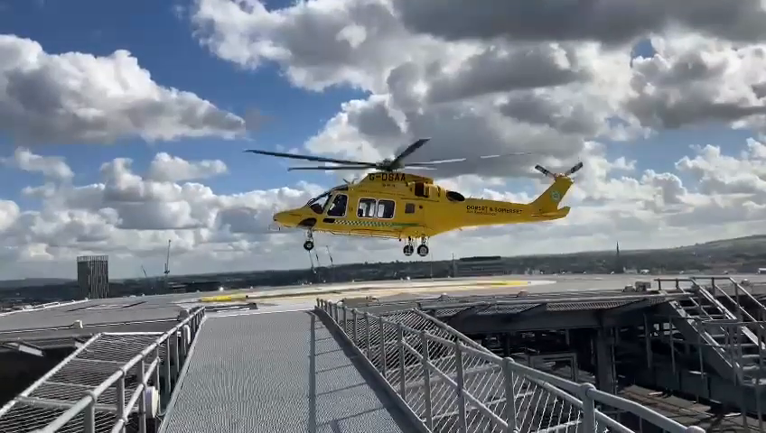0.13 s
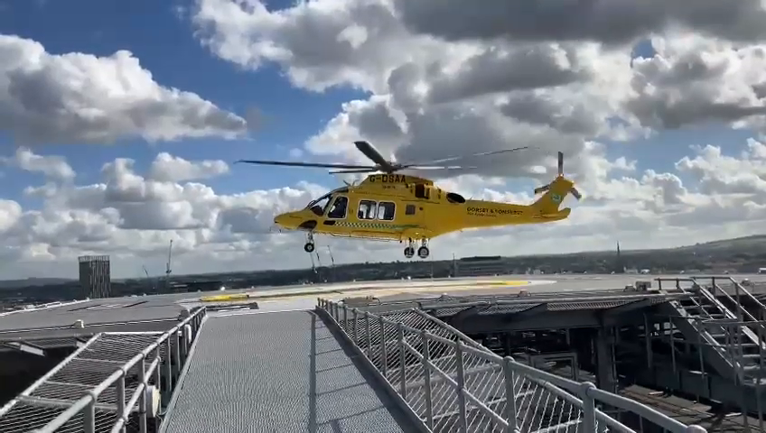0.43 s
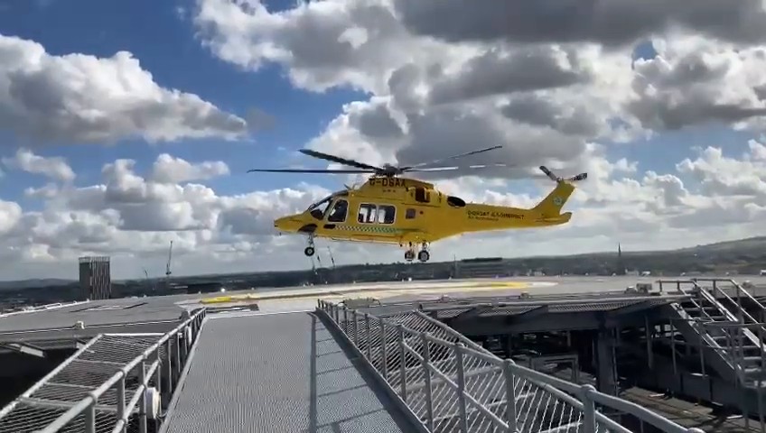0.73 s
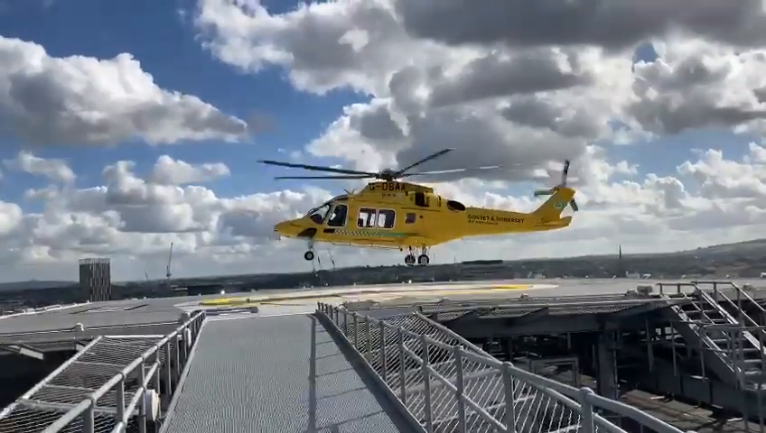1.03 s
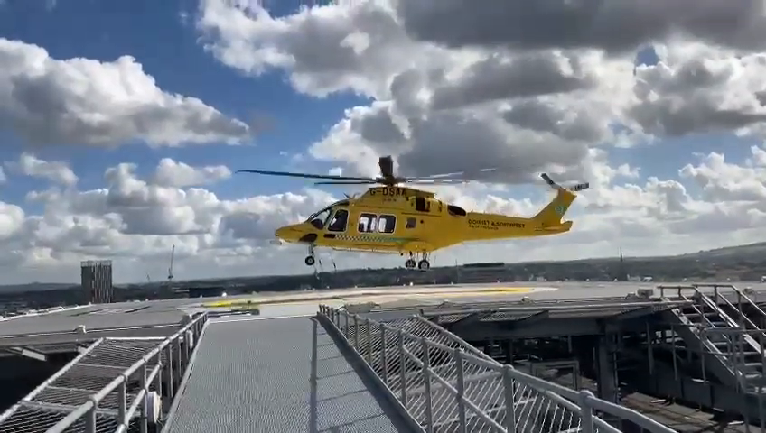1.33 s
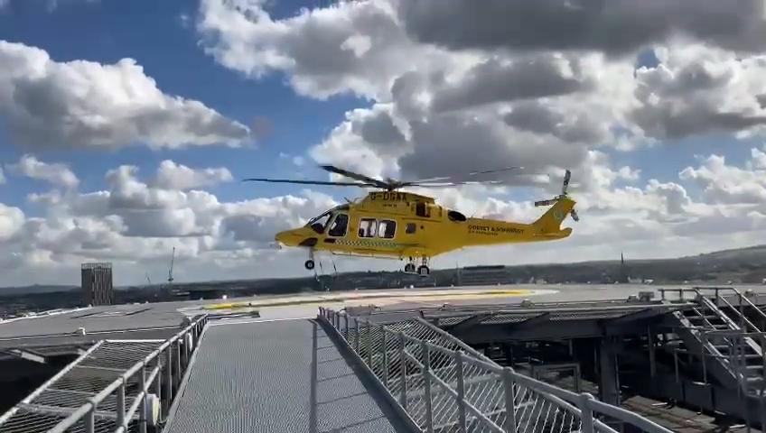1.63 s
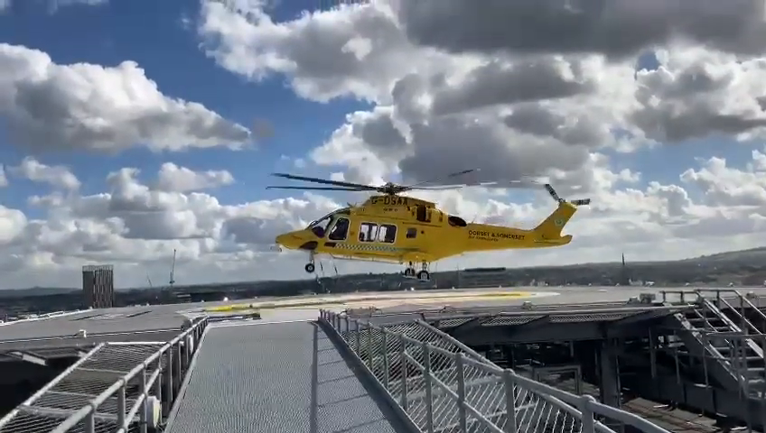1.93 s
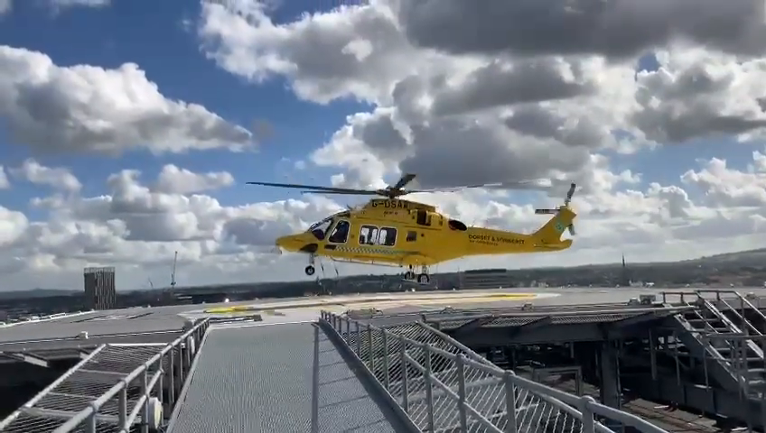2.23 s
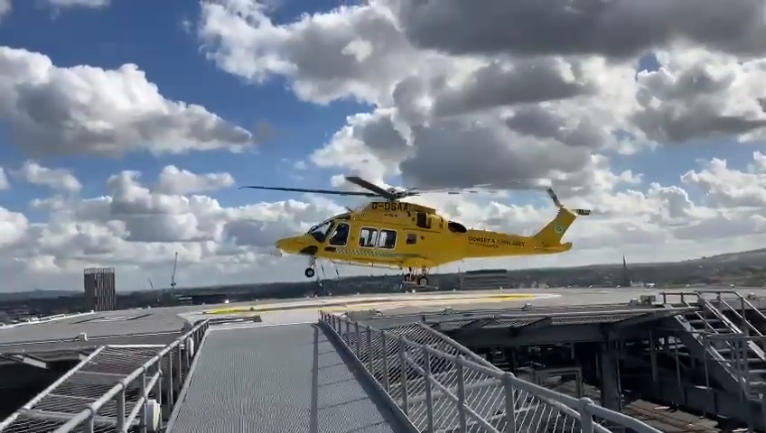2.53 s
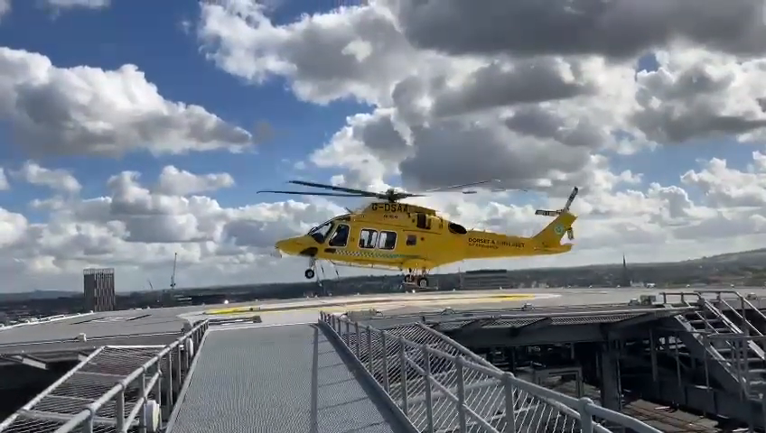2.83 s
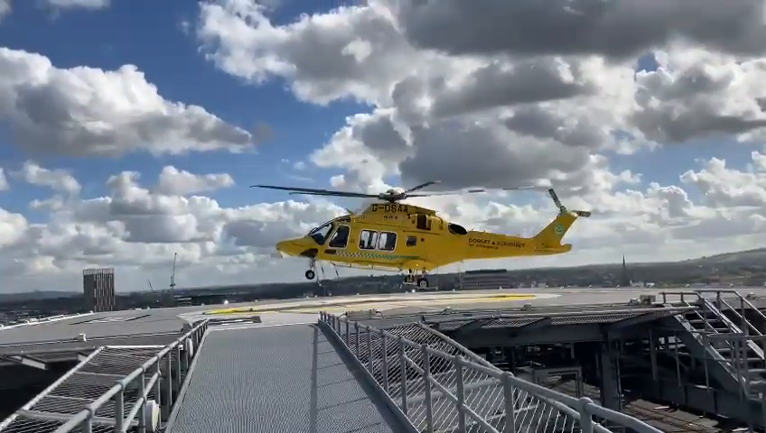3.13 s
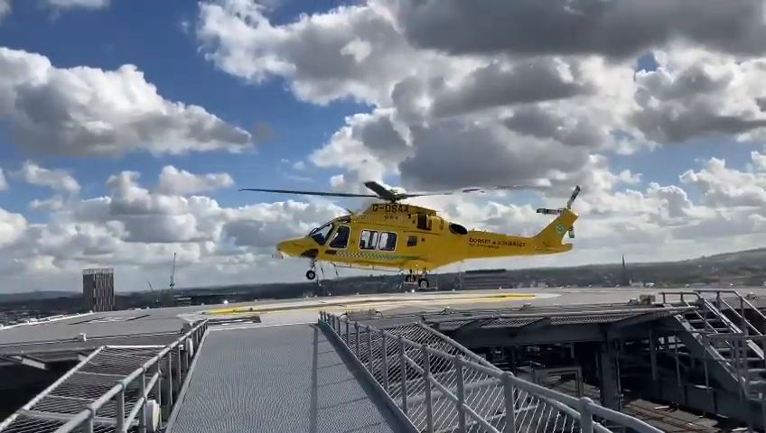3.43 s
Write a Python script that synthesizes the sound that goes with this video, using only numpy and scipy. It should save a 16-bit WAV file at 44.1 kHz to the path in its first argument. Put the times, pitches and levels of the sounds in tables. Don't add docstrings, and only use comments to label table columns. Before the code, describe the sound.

A helicopter hovers nearby over an open rooftop for 3.6 seconds. Blades slap about 29 times a second, loudest until 0.4, then softer and duller near the end, with short deck echoes. A very high whine flutters over rumble and hissing roar, strongest around 1.5. Wind thumps the microphone strongly near 0.6 and from 2.2 to 2.8, with crackles and sharp pops, then again around 3.3.

```python
import sys
import numpy as np
from scipy import signal
from scipy.fft import rfft, irfft, next_fast_len
from scipy.io import wavfile
from scipy.ndimage import uniform_filter1d

SR = 44100
rng = np.random.default_rng(int(sys.argv[2]) if len(sys.argv) > 2 else 0)


def store_pcm(level_fs):
    pcm = np.round(np.clip(level_fs, -1, 1) * 32767).astype(np.int16)
    wavfile.write(sys.argv[1], SR, np.atleast_2d(pcm).T)


def nominal_scale(level):
    x = np.asarray(level, float) / 20
    return 10 ** x


N = 158319


def in_time(rows):
    seconds, *columns = np.transpose(rows)
    return [np.interp(np.arange(N) / SR, seconds, column) for column in columns]


def rms_one(x):
    return x / np.sqrt(np.mean(x ** 2) + 1e-20)


def at_hz(points, hz, column=1):
    points = np.array(points)
    return np.interp(np.log(hz), np.log(points[:, 0]), points[:, column])


def drift(rate):
    r = np.exp(-40 * np.pi * rate / SR)
    noise = rng.standard_normal(N // 20 + 4002)
    slow = signal.lfilter([1], [1, -2 * r, r * r], noise)[4000:]
    return np.interp(np.arange(N) / 20, np.arange(len(slow)), rms_one(slow))


def ring(clicks, hz, t60):
    r, w = nominal_scale(-60 / (t60 * SR)), 2 * np.pi * hz / SR
    for _ in range(2):
        clicks = signal.lfilter([0, np.sin(w)], [1, -2 * r * np.cos(w), r * r], clicks + 1e-18)
    return clicks * 2 * np.e * (1 - r)


def narrow(hz, width_hz):
    smear = drift(width_hz) + 1j * drift(width_hz)
    carrier = np.exp(2j * np.pi * np.cumsum(hz + np.zeros(N)) / SR)
    return rms_one(np.real(smear * carrier))


# frequency in Hz, likeness from 0 to 1, lead of the left port in radians.
PORT_LIKENESS = [(60, 0.28, 0.58), (280, 0.16, -1.08), (640, 0.91, 1.72), (1500, 0.98, 0.79),
                 (2660, 0.43, 2.5), (5300, 0.035, 1.6), (7900, 0.24, -2.5), (11200, 0.77, -2)]


def banded_noise(spectrum, patchy_db, rate):
    size = next_fast_len(N)
    hz = np.arange(1, size // 2 + 2) * SR / size
    low, high = spectrum[0][0], spectrum[-1][0]
    shape = nominal_scale(at_hz(spectrum, hz)) * ((hz > low) & (hz < high))
    mid, side = rfft(rng.standard_normal((2, size))) * shape
    alike = np.clip(at_hz(PORT_LIKENESS, hz), 0, 1)
    left_right = np.array([[1], [-1]])
    pair = np.sqrt(1 + alike) * mid + np.sqrt(1 - alike) * side * left_right
    pair = pair * np.exp(.5j * at_hz(PORT_LIKENESS, hz, column=2) * left_right)
    out, together = 0, drift(rate / 2)
    for step in np.arange(np.floor(2 * np.log2(low)), 2 * np.log2(high) + 1):
        band = np.clip(1 - abs(2 * np.log2(hz) - step), 0, 1)
        flicker = nominal_scale(patchy_db * (0.33 * together + drift(rate)))
        out = out + flicker * irfft(pair * band, size)[:, :N]
    return rms_one(out)


# time in seconds, level in dB.
STEADY_WASH = [(0, -45), (.5, -53), (1.0, -43), (1.3, -36), (1.5, -31), (1.8, -46.5), (2.2, -36.5),
               (2.9, -33), (3.2, -31), (3.59, -34)]
# middle in seconds, length in seconds, level in dB,
# crackle in dB relative to the gust.
PORT_GUSTS = [(0.405, 0.14, -30.5, -5.5), (0.574, 0.028, -21, -31), (0.64, 0.052, -14.5, -17),
              (0.696, 0.071, -19.5, -10), (0.799, 0.079, -24, -26), (0.872, 0.045, -27, 0.5),
              (0.898, 0.039, -39, -10), (1.004, 0.16, -34, -7), (1.25, 0.03, -28, -4),
              (1.454, 0.084, -26, -9.5), (1.549, 0.078, -23.5, -22), (2.241, 0.065, -25, -16),
              (2.289, 0.066, -21, -14.5), (2.398, 0.11, -23, -17), (2.493, 0.023, -17, -7.5),
              (2.532, 0.073, -23.5, -14), (2.607, 0.064, -13.5, -15.5), (2.668, 0.079, -21, -8),
              (2.728, 0.038, -19.5, -17), (2.794, 0.05, -23.5, -6.5), (2.813, 0.13, -21.5, -13),
              (3.328, 0.069, -20, -17.5), (3.482, 0.068, -27.5, -12)]
# frequency in Hz, level in dB per Hz.
WIND_COLOUR = [(25, -19), (50, -6), (110, -10), (250, -17.5), (400, -32), (700, -30)]
# frequency in Hz, level in dB per Hz.
CRACKLE_COLOUR = [(150, -2.5), (280, 8.5), (650, -4), (1300, -3.5), (2500, -16), (4000, -26), (5500, -32)]
CRACKLE_LEAD_S = 0.011


def wind():
    t, low, bright = np.arange(N) / SR, nominal_scale(in_time(STEADY_WASH)[0]), 0
    for s, length, db, crackle_db in PORT_GUSTS:
        low = low + nominal_scale(db) * np.exp(-((t - s) / (0.45 * length)) ** 2)
        bump = np.exp(-((t - s + CRACKLE_LEAD_S) / (0.43 * length)) ** 2)
        bright = bright + nominal_scale(db + crackle_db) * bump
    lumps = banded_noise(WIND_COLOUR, patchy_db=3.5, rate=20.4)
    lumps = lumps / np.sqrt(uniform_filter1d(lumps ** 2, size=1600) + 0.27)
    return low * lumps + bright * banded_noise(CRACKLE_COLOUR, patchy_db=1.5, rate=60)


# time in seconds, peak in dB.
EDDY_POPS = [
    (0.0646, -23),
    (1.2944, -25),
    (1.328, -29),
    (1.7779, -36),
    (1.978, -25),
    (2.1174, -26),
    (2.4809, -21),
    (2.582, -29),
    (2.6658, -36),
    (2.7752, -20),
]
POP_HZ, POP_T60_S = 2450, 0.0012


def pops():
    s, db = np.transpose(EDDY_POPS)
    clicks = np.zeros(N)
    clicks[((s + .0015) * SR).astype(int)] = nominal_scale(db - 2.5)
    return ring(clicks, POP_HZ, POP_T60_S)


# time in seconds, level in dB.
ENGINE_LOAD = [(0.0, -37), (0.34, -37.5), (0.82, -36.5), (1.03, -37.5), (2.55, -39.5), (2.65, -37),
               (3.08, -41.5), (3.59, -38)]
# frequency in Hz, level in dB per Hz.
RUMBLE_COLOUR = [(15, -46), (25, -9.5), (81, 0.5), (113, -5), (190, -9.5), (260, -11), (372, -11.5),
                 (490, -8.5), (600, -13), (769, -20.5), (1000, -17.5), (1300, -76), (2200, -120)]
# frequency in Hz, level in dB per Hz.
JET_COLOUR = [(470, -74), (760, 2), (890, -12.5), (1100, -5), (1340, 3.5), (1640, -4.5), (3030, -8),
              (4580, -12), (4900, -12.5), (5470, -21), (6000, -17), (7800, -32), (13200, -120)]
# frequency in Hz, level in dB per Hz.
HISS_COLOUR = [(5700, -2), (6400, 0.5), (8300, 4.5), (8800, -18), (9300, 2), (9800, 15.5), (11000, 3),
               (11750, 15.5), (12100, 4.5)]
RUMBLE_DB, JET_DB, HISS_DB = -31.5, -43, -42.5
ROAR_PATCHY_DB = 1.9


def roar(throb):
    load, = in_time(ENGINE_LOAD)
    load = load - load.mean()
    rumble = banded_noise(RUMBLE_COLOUR, ROAR_PATCHY_DB, rate=12.5) * throb ** 1.06
    jet = banded_noise(JET_COLOUR, ROAR_PATCHY_DB, rate=7.9) * throb
    hiss = banded_noise(HISS_COLOUR, patchy_db=1.1, rate=40) * throb ** 0.5
    rumble = nominal_scale(RUMBLE_DB + 0.28 * load) * rumble
    return rumble + nominal_scale(JET_DB + load) * jet + nominal_scale(HISS_DB + 1.06 * load) * hiss


# time in seconds, level in dB.
WHINE_LEVEL = [(0.0, -28), (0.17, -26), (0.88, -25), (1.47, -20), (1.59, -22), (1.72, -21), (1.95, -27),
               (2.64, -23), (2.95, -27), (3.2, -30.5), (3.52, -23), (3.59, -22)]
# time in seconds, peak in dB, pitch in Hz.
WHINE_FLARES = [(0.013, -24.0, 11370.0), (0.055, -26.0, 11370.0), (0.076, -31.0, 11370.0),
                (0.105, -28.0, 11340.0), (0.161, -28.0, 11350.0), (0.234, -24.0, 11380.0),
                (0.307, -26.0, 11390.0), (0.364, -25.0, 11390.0), (0.408, -18.0, 11400.0),
                (0.482, -23.0, 11400.0), (0.549, -25.0, 11380.0), (0.619, -29.0, 11420.0),
                (0.644, -28.0, 11420.0), (0.678, -27.0, 11420.0), (0.826, -27.0, 11370.0),
                (0.884, -24.0, 11390.0), (0.915, -22.0, 11360.0), (0.97, -27.0, 11370.0),
                (1.005, -29.0, 11400.0), (1.029, -26.0, 11400.0), (1.088, -24.0, 11410.0),
                (1.19, -27.0, 11370.0), (1.24, -23.0, 11370.0), (1.302, -21.0, 11390.0),
                (1.332, -22.0, 11360.0), (1.411, -22.0, 11390.0), (1.456, -19.0, 11400.0),
                (1.536, -16.0, 11380.0), (1.571, -23.0, 11400.0), (1.612, -22.0, 11420.0),
                (1.655, -23.0, 11400.0), (1.779, -25.0, 11450.0), (1.885, -30.0, 11400.0),
                (1.957, -27.0, 11400.0), (1.979, -25.0, 11370.0), (2.007, -29.0, 11350.0),
                (2.053, -30.0, 11370.0), (2.137, -24.0, 11350.0), (2.242, -24.0, 11330.0),
                (2.284, -28.0, 11340.0), (2.381, -28.0, 11370.0), (2.415, -26.0, 11380.0),
                (2.513, -22.0, 11350.0), (2.564, -28.0, 11380.0), (2.61, -22.0, 11390.0),
                (2.693, -24.0, 11380.0), (2.725, -26.0, 11410.0), (2.761, -23.0, 11390.0),
                (2.783, -21.0, 11390.0), (2.863, -29.0, 11380.0), (2.894, -29.0, 11350.0),
                (2.983, -28.0, 11390.0), (3.046, -31.0, 11390.0), (3.07, -29.0, 11380.0),
                (3.108, -31.0, 11370.0), (3.146, -28.0, 11360.0), (3.178, -30.0, 11370.0),
                (3.225, -31.0, 11360.0), (3.287, -24.0, 11350.0), (3.33, -23.0, 11360.0),
                (3.389, -25, 11340),
    (3.436, -26, 11350),
    (3.482, -24, 11380),
    (3.578, -26, 11410),
]
# frequency in Hz, width in Hz, level in dB.
SHAFT_TONES = [
    (4850, 20, -61),
    (8350, 70, -63.5),
    (80.54, 14.5, -43),
]
WHINE_WIDTH_HZ, WHINE_FLUTTER_DB, WHINE_SIDE_DB = 50, 1.6, -21
SKIRT_WIDTH_HZ, SKIRT_DB = 190, -8
FLARE_S, FLARE_DB = 0.013, 6.5


def turbine(throb):
    flare_rows = WHINE_FLARES
    _, hz = in_time(flare_rows)
    db, = in_time(WHINE_LEVEL)
    t = np.arange(N) / SR
    whine = 0.55 * narrow(hz, WHINE_WIDTH_HZ)
    whine = whine + nominal_scale(SKIRT_DB) * narrow(hz + 140, SKIRT_WIDTH_HZ)
    whine = whine + nominal_scale(WHINE_SIDE_DB) * narrow(hz, SKIRT_WIDTH_HZ) * [[1], [-1]]
    out = nominal_scale(db + 3.5 + WHINE_FLUTTER_DB * drift(63)) * whine * throb ** 0.091
    flares = 0
    for s, peak_db, _ in flare_rows:
        flares = flares + nominal_scale(peak_db + FLARE_DB) * np.exp(-((t - s) / FLARE_S) ** 2)
    out = out + flares * np.cos(2 * np.pi * np.cumsum(hz + 23.8 * drift(43.2)) / SR)
    for tone_hz, width_hz, tone_db in SHAFT_TONES:
        out = out + nominal_scale(tone_db + 3.95 * drift(12.7)) * narrow(tone_hz, width_hz)
    return out


# time of one slap in seconds, slaps per second,
# lag of the right port in milliseconds, thump pitch in Hz, crack pitch in Hz.
SLAP_PULSE = [
    (.0664, 29.2, 2.2, 440, 1180),
    (.5127, 28.9, 2.0, 500, 1250),
    (1.6068, 29.02, 2.1, 520, 1420),
    (2.9534, 28.94, 1.6, 525, 1400),
]
# middle in seconds, half length in seconds, thump in dB,
# left port in dB relative to the right, crack in dB.
SLAP_LOUDNESS = [
    (.22, .2, -14.5, -2.5, -26.5),
    (.8, .42, -23, -6, -31),
    (1.75, .58, -22.5, -5, -31.5),
    (3.22, .42, -21, -3, -41),
]
SLAP_JITTER_S = .00015
THUMP_T60_S, THUMP_SPREAD_DB, ECHO_S, ECHO_DB = .0085, 1.0, .0105, -8
CRACK_T60_S, CRACK_LEAD_S, CRACK_SPREAD_DB, SECOND_CRACK_DB = .0055, 0.0055, 2.5, -9
SNAP_HZ, SNAP_T60_S, SNAP_DB = 2420, 0.0037, -17.5
BLADE_THROB, THROB_S = 0.63, .006


def blades():
    knocks, throb = 0, np.zeros(N + SR)
    for pulse, loudness in zip(SLAP_PULSE, SLAP_LOUDNESS):
        at, rate, lag_ms, hz, crack_hz = pulse
        middle, half, thump_db, left_db, crack_db = loudness
        s = at + np.arange(-40, 41) / rate
        draw = rng.standard_normal((len(s), 6))
        keep = (s > .02) & (s < N / SR)
        s, draw = s[keep], draw[keep]
        fade = np.exp(-((s - middle) / half) ** 4)
        thump, crack = np.zeros((2, 2, N + SR))
        for later, loss_db in ((0, 0), (ECHO_S, ECHO_DB)):
            at_right = s + later - .0026 + SLAP_JITTER_S * draw[:, 0]
            at_left = at_right - lag_ms / 1000
            size = fade * nominal_scale(thump_db + loss_db + THUMP_SPREAD_DB * draw[:, 1])
            thump[0, (at_left * SR).astype(int)] += size * nominal_scale(left_db)
            thump[1, (at_right * SR).astype(int)] += size
        for k, later in enumerate((0, .007)):
            when = ((s - CRACK_LEAD_S + later + 0.0007 * draw[:, 2 + k]) * SR).astype(int)
            size = fade * nominal_scale(crack_db + k * SECOND_CRACK_DB + CRACK_SPREAD_DB * draw[:, 4 + k])
            crack[0, when] += size
            crack[1, when + 3] += size
        knocks = knocks + ring(thump, hz, THUMP_T60_S) + ring(crack, crack_hz, CRACK_T60_S)
        knocks = knocks + nominal_scale(SNAP_DB) * ring(crack, SNAP_HZ, SNAP_T60_S)
        throb[((s - CRACK_LEAD_S) * SR).astype(int)] += fade
    bump = np.exp(-(np.arange(-600, 601) / SR / THROB_S) ** 2)
    swell = np.convolve(throb, bump, "same")
    return knocks[:, :N], 1 + BLADE_THROB * swell[:N]


DECK_DIP_HZ, DECK_DIP_WIDTH_HZ, DECK_DIP_SHARE = 725, 110, .6


def scene():
    knocks, throb = blades()
    craft = knocks + turbine(throb) + roar(throb)
    dip_filter = signal.iirpeak(DECK_DIP_HZ, DECK_DIP_HZ / DECK_DIP_WIDTH_HZ, fs=SR)
    dip = signal.lfilter(*dip_filter, craft)
    return craft - DECK_DIP_SHARE * dip + wind() + pops()


def roll_off(x):
    return signal.sosfilt(signal.butter(12, 12380, fs=SR, output="sos"), x)


GUARD_S, GUARD_RISE_S, MONO_BELOW_HZ = 1.45, .4, 520
CUTOFF_HZ, RUMBLE_CUT_HZ = 12850, 51


def record(dry):
    mid, side = (dry[0] + dry[1]) / 2, (dry[0] - dry[1]) / 2
    hz, s, cells = signal.stft(side, SR, nperseg=4096, noverlap=3584)
    since = np.clip(s - GUARD_S, 0, None)
    edge_hz = MONO_BELOW_HZ * (1 - np.exp(-np.sqrt(since / GUARD_RISE_S) * 1.5))
    kept = np.clip((hz[:, None] + 1) / (edge_hz + 1), 0, 1) ** 24
    side = signal.istft(cells * kept, SR, nperseg=4096, noverlap=3584)[1][:N]
    treble_cut = signal.cheby2(12, 70, CUTOFF_HZ, fs=SR, output="sos")
    rumble_cut = signal.butter(2, RUMBLE_CUT_HZ, "high", fs=SR, output="sos")
    out = signal.sosfilt(treble_cut, [mid + side, mid - side])
    out = signal.sosfilt(rumble_cut, out)
    return roll_off(out)


dry = scene()
out = record(dry)
store_pcm(out)
```